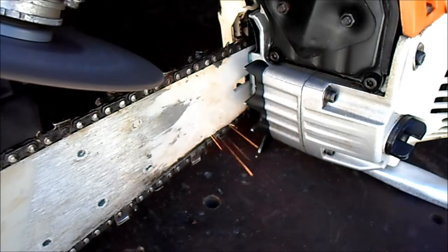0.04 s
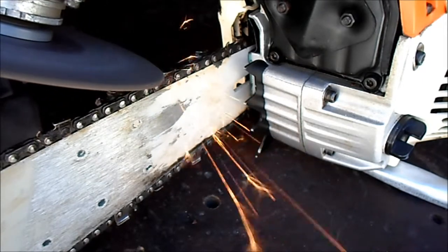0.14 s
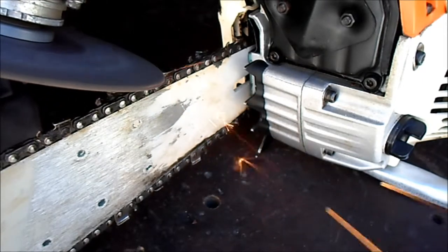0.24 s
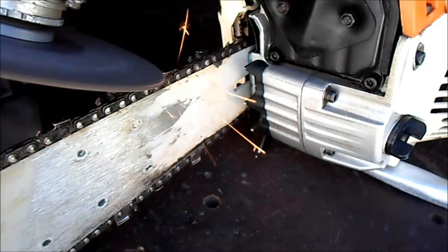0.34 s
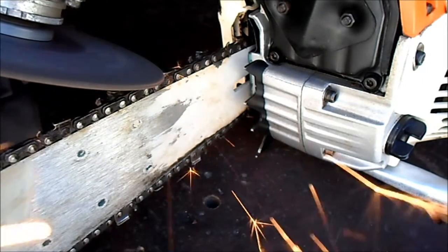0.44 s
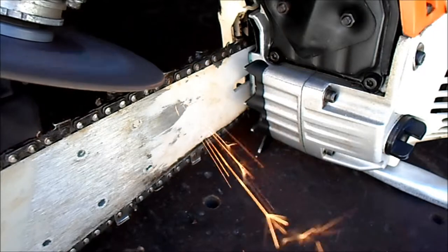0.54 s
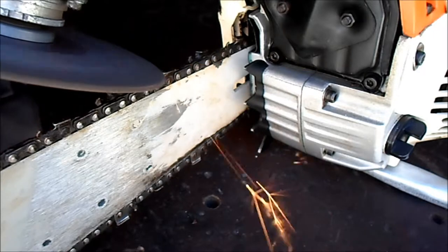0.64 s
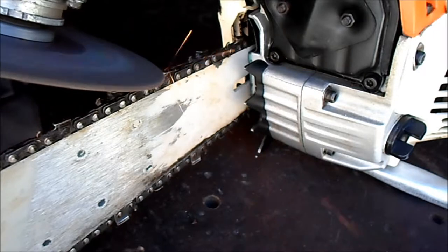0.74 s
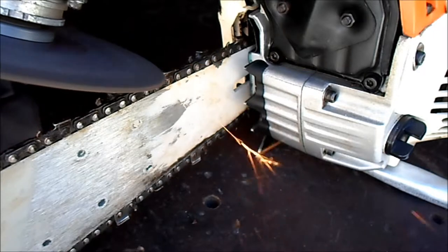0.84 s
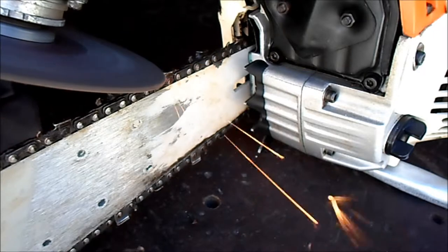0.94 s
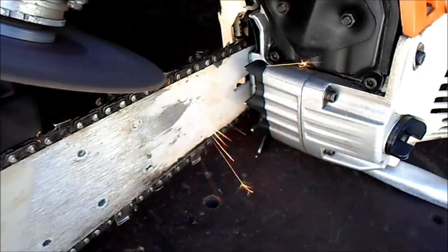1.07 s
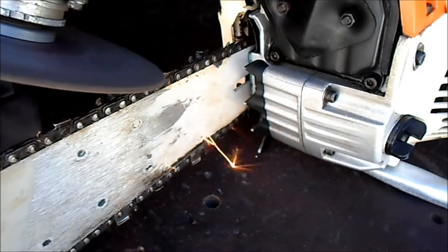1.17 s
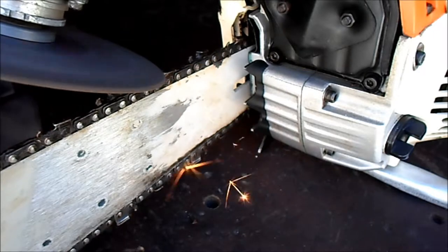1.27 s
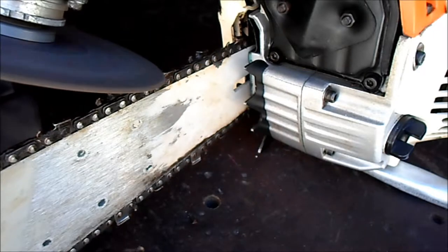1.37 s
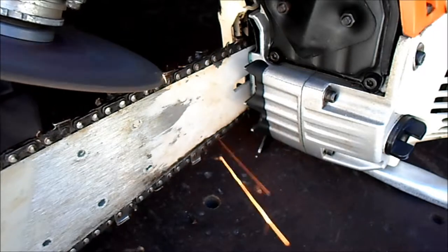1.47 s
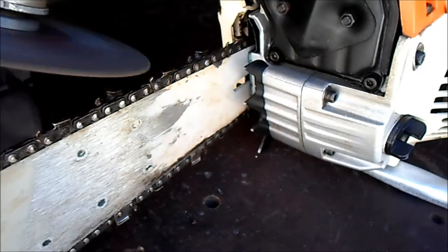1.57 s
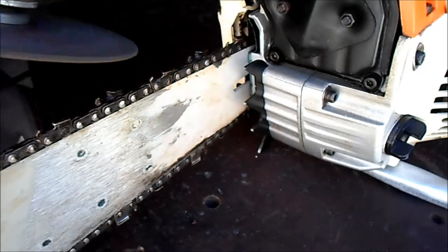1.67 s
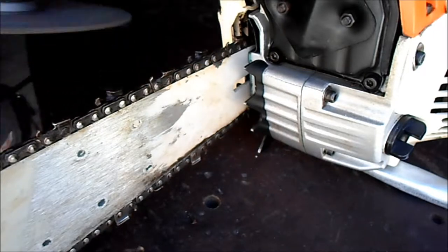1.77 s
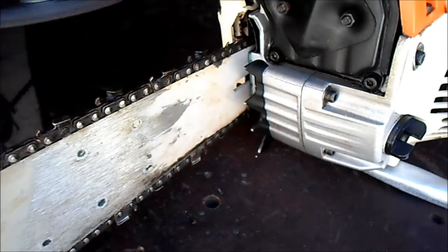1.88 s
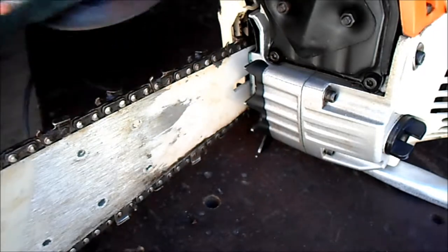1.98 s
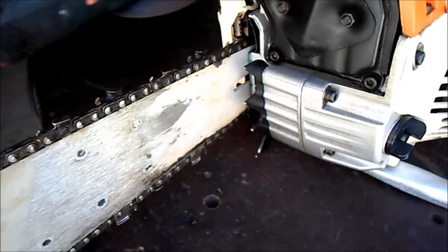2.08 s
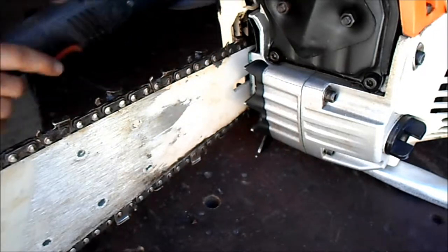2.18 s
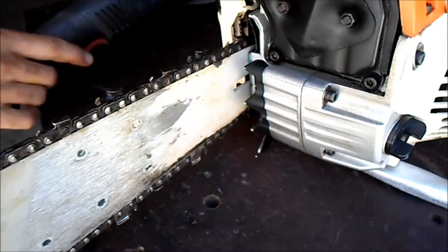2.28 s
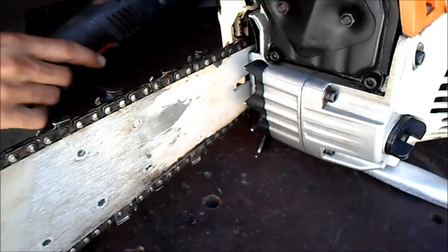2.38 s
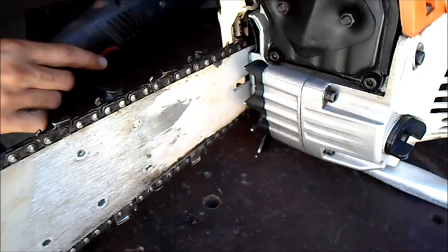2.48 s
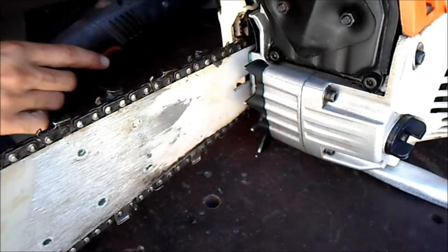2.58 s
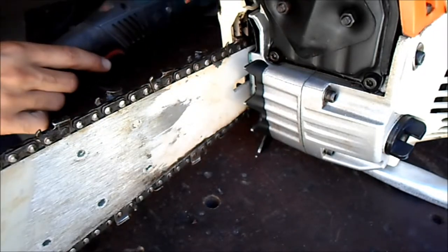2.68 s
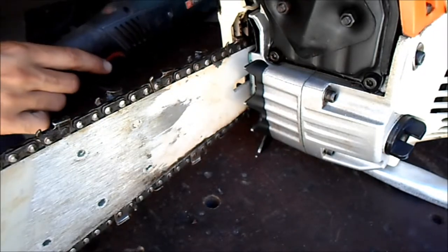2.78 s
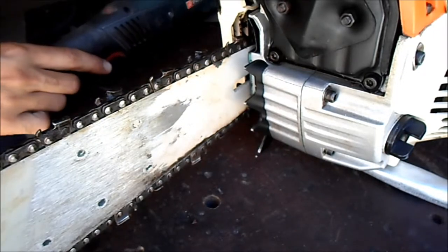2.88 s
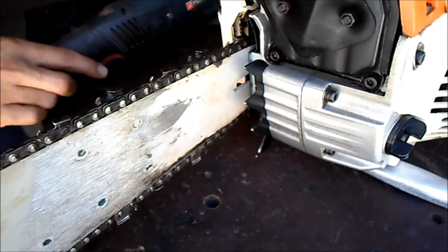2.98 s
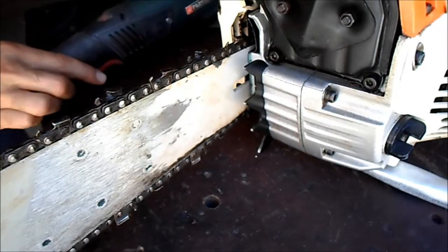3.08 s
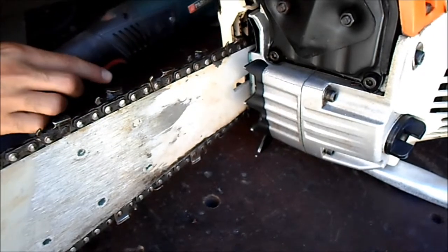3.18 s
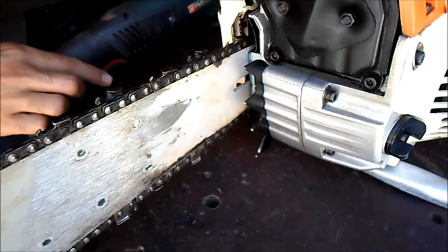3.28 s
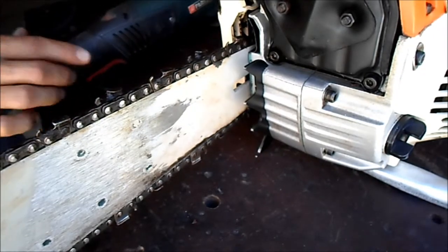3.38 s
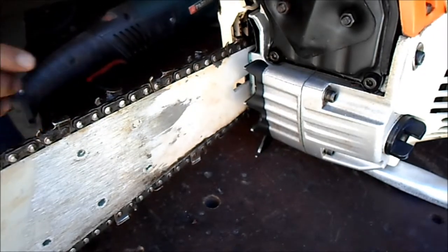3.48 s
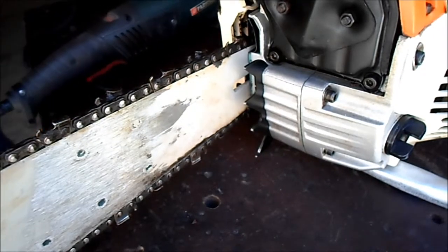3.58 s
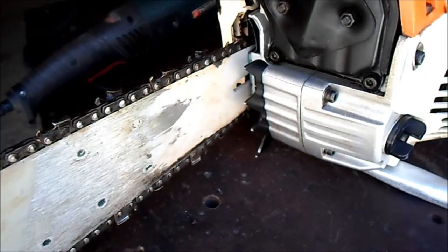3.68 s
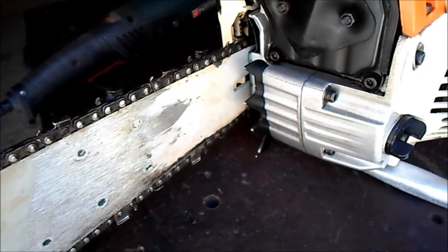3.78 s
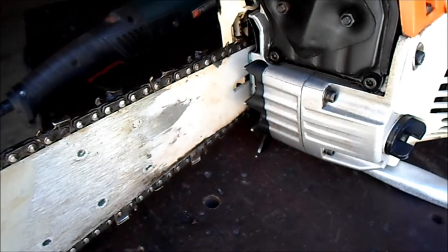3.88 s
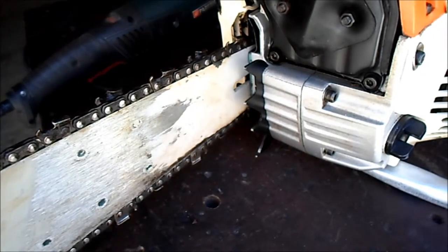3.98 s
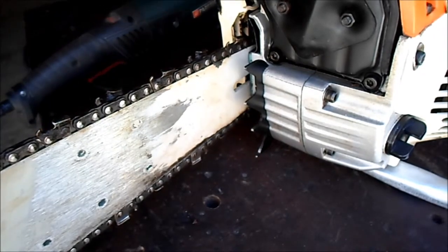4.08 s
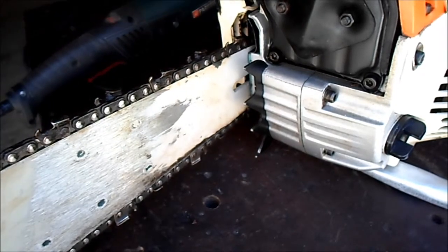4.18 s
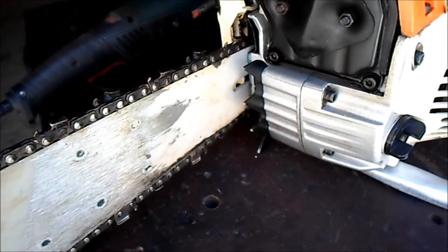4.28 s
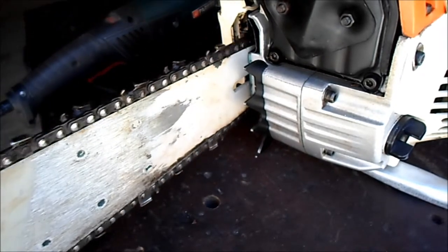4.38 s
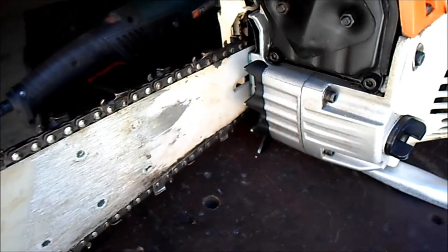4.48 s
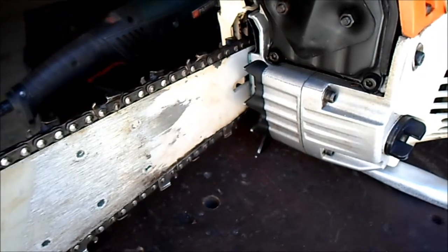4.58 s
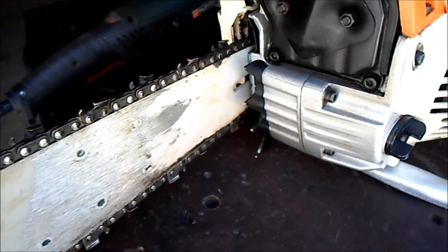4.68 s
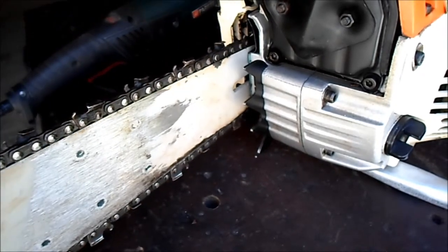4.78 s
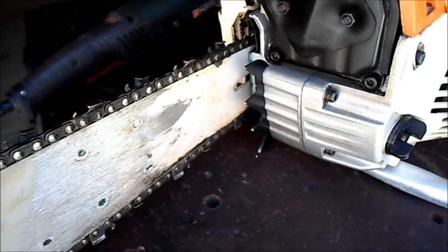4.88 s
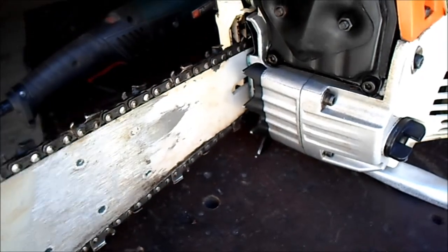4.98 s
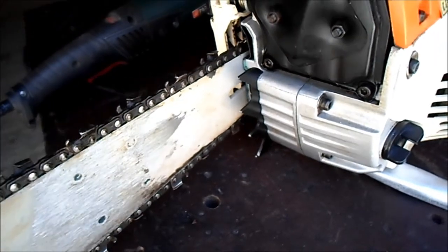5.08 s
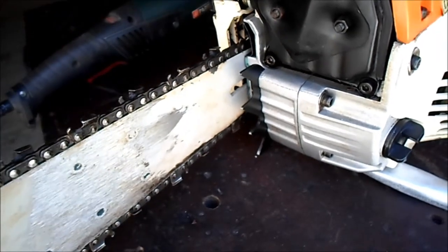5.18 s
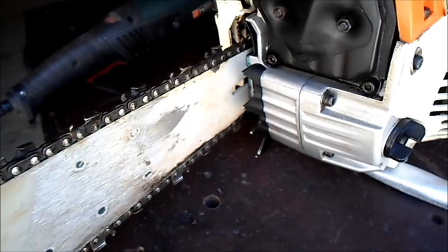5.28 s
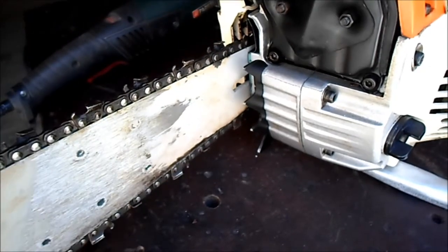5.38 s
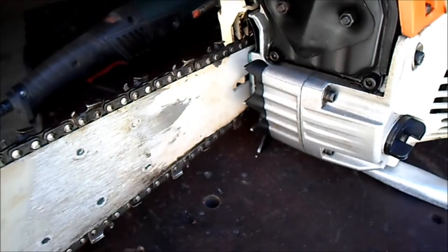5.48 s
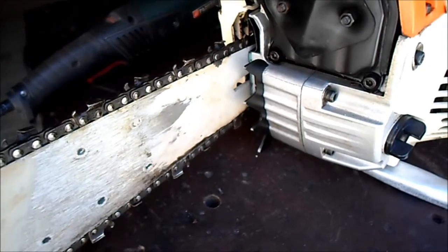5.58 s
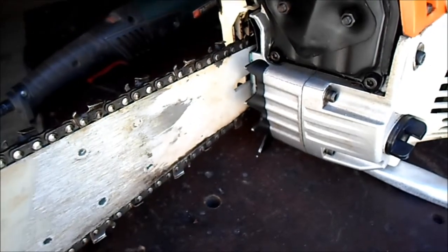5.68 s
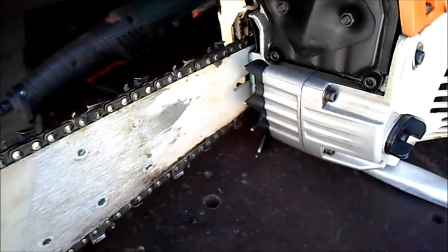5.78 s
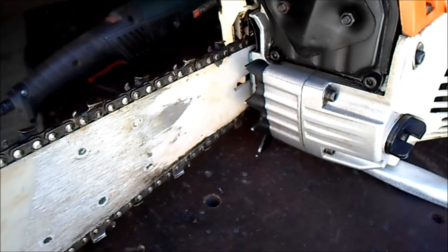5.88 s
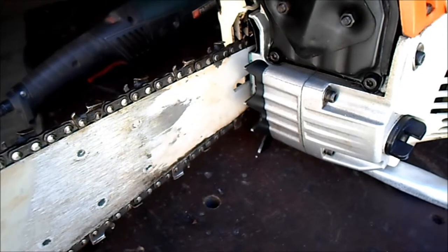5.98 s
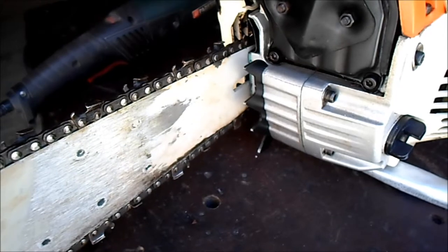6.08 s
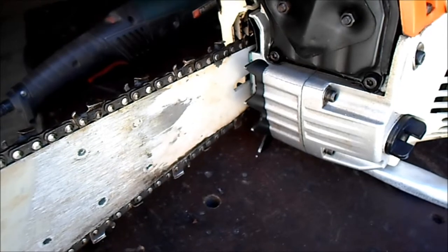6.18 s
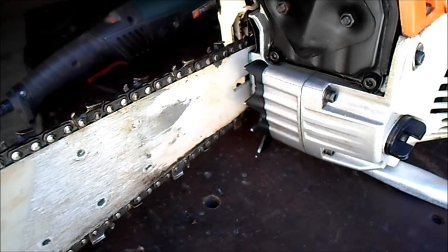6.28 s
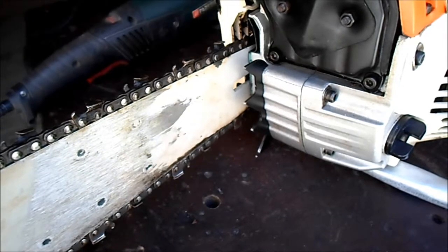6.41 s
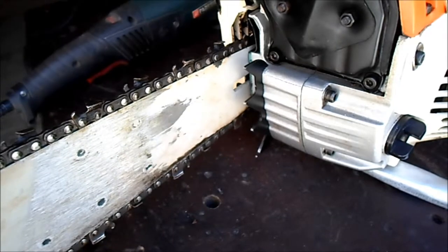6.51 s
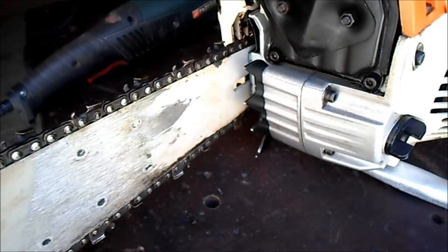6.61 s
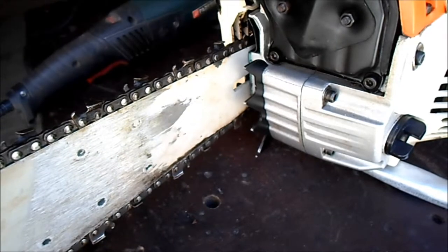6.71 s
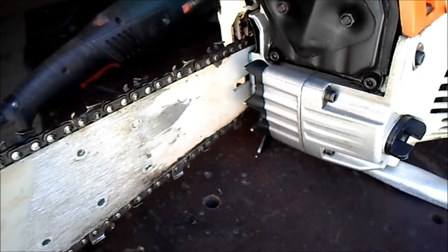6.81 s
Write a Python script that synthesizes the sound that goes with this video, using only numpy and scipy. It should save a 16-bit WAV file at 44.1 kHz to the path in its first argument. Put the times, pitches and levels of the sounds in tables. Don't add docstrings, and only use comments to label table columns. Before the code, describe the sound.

Close up in a workshop, a switched-off angle grinder slows against a saw chain tooth: bright, gritty, throbbing hiss with a sinking whine. It lifts away and its loose gears whirr and clatter, ever slower. The tool thumps onto a hollow bench and the disc scrapes and catches to a stop. Over low room rumble come a sharp snap, small clicks, heavy knocks and faint rustling.

```python
import sys
import numpy as np
from scipy import signal
from scipy.fft import rfft, irfft
from scipy.io import wavfile
from scipy.ndimage import uniform_filter1d

SR = 44100
rng = np.random.default_rng(int(sys.argv[2]) if len(sys.argv) > 2 else 0)


def persist_wave(psi):
    counts = np.round(np.clip(psi, -1, 1) * 32767).astype(np.int16)
    wavfile.write(sys.argv[1], SR, np.atleast_2d(counts).T)


def gain_from_decibels(decibels):
    exponent = np.asarray(decibels, float) / 20
    return 10 ** exponent


N = 302085
T = np.arange(N) / SR
LIFT_OFF_S = 1.742
FLAT = ((1, 0), (2, 0))  # (frequency [Hz], level [dB])


def evened(x):
    return x / np.sqrt(np.mean(x ** 2) + 1e-20)


def curves(rows, outside=None):
    s, first, *rest = np.transpose(rows)
    return [np.interp(T, s, first, outside, outside)] + [np.interp(T, s, c) for c in rest]


def colour(x, peaks, lo_hz, hi_hz, base_db=-14, spectrum=FLAT):
    hz = abs(np.fft.fftfreq(8192, 1 / SR)) + 1
    f, db = np.transpose(spectrum)
    power = gain_from_decibels(2 * (base_db + np.interp(np.log(hz), np.log(f), db)))
    power = power + sum(gain_from_decibels(2 * d) / (1 + (2 * (hz - c) / w) ** 2) for c, w, d in peaks)
    power = power / (1 + (lo_hz / hz) ** 8) / (1 + (hz / hi_hz) ** 12)
    log_response = np.conj(signal.hilbert(np.log(power + 1e-10) / 2))
    taps = np.fft.ifft(np.exp(log_response)).real[:4096]
    return signal.oaconvolve(x, taps / np.linalg.norm(taps))[:N]


def gritty(per_s, spread_db, share):
    size = gain_from_decibels(spread_db * np.minimum(rng.exponential(1, N), 5)) * (rng.random(N) < per_s / SR)
    smear = np.exp(-np.arange(60) / 14)
    grains = evened(np.convolve(size, smear)[:N])
    return evened((1 + share * grains) * rng.standard_normal(N))


def mottled(x, depth_db, frames, bins):
    z = signal.stft(x, nperseg=256)[2]
    patches = uniform_filter1d(rng.standard_normal(z.shape), bins, axis=0)
    patches = depth_db * evened(uniform_filter1d(patches, frames, axis=1))
    z = z * gain_from_decibels(patches) / np.sqrt(np.mean(gain_from_decibels(2 * patches)))
    return signal.istft(z, nperseg=256)[1][:N]


def bursts(events, peaks, lo_hz, split_hz, rise, echo_db, echo_t60, spectrum=FLAT, base_db=-14,
           tick=0., spike_db=-99):
    low, high = np.zeros((2, N + SR))
    noise, spikes = rng.standard_normal(N), np.zeros((2, N))
    t = np.arange(round(.2 * SR)) / SR
    tail = gain_from_decibels(echo_db - 60 * t / echo_t60) * np.minimum(t / 0.0076, 1)
    for s, peak_db, treble_db, length in events:
        rap = np.exp(-(t / max(length, .0005)) ** 1.26) + tick * np.exp(-t / 0.00083)
        rap *= np.minimum(t / rise, 1)
        at = round(s * SR)
        rap *= np.linalg.norm(rap) / np.linalg.norm(rap[:N - at] * noise[at:at + len(t)])
        low[at:at + len(t)] += gain_from_decibels(peak_db - 11) * (rap + tail)
        high[at:at + len(t)] += gain_from_decibels(peak_db - 6.5 + treble_db) * (rap ** 1.26 + tail)
        spikes[:, at + 4] += gain_from_decibels([peak_db + spike_db, peak_db + spike_db + treble_db])
    low = colour(low[:N] * noise + spikes[0], peaks, lo_hz, split_hz, base_db, spectrum)
    return low + colour(high[:N] * noise + spikes[1], peaks, split_hz, 21000, base_db, spectrum)


# (frequency [Hz], level [dB per Hz])
SHOP = [(12, -33), (20, -6), (43, -2), (86, -4.5), (217, -24.5), (464, -22), (549, -25.5), (668, -27),
        (910, -30.5), (1390, -27), (1790, -31.5), (2960, -41), (3920, -44), (14300, -62), (16400, -79)]
# (centre time [s], level [dB], half length [s])
RUSTLE = [(3.624, -62, 0.044), (4.006, -58, 0.018), (4.525, -53, .015), (4.608, -53, 0.078),
          (4.875, -58, 0.03), (5.157, -48, 0.023), (5.243, -50, 0.051), (5.434, -48, 0.055),
          (5.552, -56, 0.061), (5.849, -43.5, 0.011), (5.917, -45, 0.036), (6.0, -51.5, .012),
          (6.237, -60, .015), (6.48, -56, 0.045)]


def background():
    lumps = evened(uniform_filter1d(uniform_filter1d(rng.standard_normal(N), size=2500), size=2500))
    hums = [(42.2, 26, 0.6), (82.6, 30.4, -2.5)]  # (frequency [Hz], width [Hz], level [dB])
    shop = evened(colour(rng.standard_normal(N), hums, 25.4, 20000, -1.5, SHOP))
    rumble = signal.sosfiltfilt(signal.butter(2, 250, fs=SR, output="sos"), shop)
    shop = gain_from_decibels(-35.5) * (shop - rumble + rumble * gain_from_decibels(1.0 * lumps))
    hiss = gain_from_decibels(-66) * colour(rng.standard_normal(N), [], 8700, 20000)

    grains = gritty(per_s=1200., spread_db=2.5, share=.3)
    rustle = colour(grains, [(14500, 3900, -1.0), (7460, 3400, -7.0)], 2000, 21000, 3)
    strokes = sum(gain_from_decibels(db) * np.exp(-((T - at) / half) ** 2) for at, db, half in RUSTLE)

    open_db, held_db, sink_db_per_s, recover_s = 1.33, -14.5, -2, 0.46
    drop_db = held_db - open_db + sink_db_per_s * np.minimum(T, LIFT_OFF_S)
    gain_db = open_db + drop_db * np.exp(-(np.maximum(T - LIFT_OFF_S, 0) / recover_s) ** 1.34)
    dent_s, dent_db, dent_recover_s = 3.32, -8, 0.48
    since = np.maximum(T - dent_s, 0)
    gain_db += dent_db * np.minimum(since / .15, 1) * np.exp(-since / dent_recover_s)
    return (shop + hiss) * gain_from_decibels(gain_db) + rustle * strokes


# (time [s], peak level [dB], treble over it [dB])
CLICKS = [(3.611, -37, -12), (3.658, -35.5, -21), (4.571, -31, -18), (4.632, -34, -33), (4.772, -25.5, -29),
          (5.3618, -27, -15), (5.4037, -24, -9), (5.4161, -35, -6), (5.4322, -26, -10), (5.4731, -31, -6),
          (5.4995, -34, -6), (5.5216, -31, 1), (5.5391, -34, -4), (5.5545, -34, -2), (5.5781, -31, 0),
          (5.867, -34, -8), (5.943, -42, -19), (6.4981, -28, -10)]
# (frequency [Hz], width [Hz], level [dB])
PARTS = [(870, 1000, -6), (2070, 160, -2.5), (3600, 500, -18), (5170, 1100, -12), (7140, 1200, -6.5),
         (11300, 3800, -16), (14500, 2100, -14)]


def clicks():
    click_s, loud_s_per_db = .0031, .00007
    hits = [(s, db, treble_db, click_s + loud_s_per_db * (db + 25)) for s, db, treble_db in CLICKS]
    return bursts(hits, PARTS, 610, 3580, .0001, -27, 0.18, tick=.6, spike_db=-2)


# (time [s], peak level [dB], treble over it [dB], length [s])
CRUNCH = [
    (2.44, -33.5, -1, 0.049),
    (3.038, -12.5, -7.5, 0.0092),
    (4.546, -30.5, -1.5, 0.024),
    (5.606, -23, -6, 0.02),
    (5.613, -20.5, -3, 0.009),
    (5.887, -19, -10, 0.008),
]


def crunch():
    top = [(840, 650, 5.0), (1320, 910, -14), (2000, 460, -3), (3500, 400, -1)]
    return bursts(CRUNCH, top, 430, 1370, 0.0011, -23, 0.29, [(1000, 19), (4500, 0), (8000, -30)])


# (time [s], peak level [dB], treble over it [dB], length [s])
LATCH = [
    (4.1195, -10.5, 3.5, 0.00089),
    (4.1207, -17, 2.5, 0.0024),
]
CLIP = [
    (4.545, -24, 2.5, .001),
    (4.5458, -13, 4, 0.0022),
]
CATCH = [
    (5.8868, -24, 2.5, .003),
    (5.8898, -14, 4, 0.0017),
    (5.8913, -11.5, 4, .003),
    (5.8985, -26, -1.5, .002),
    (5.906, -31, -1.5, .003),
]
# (frequency [Hz], width [Hz], level [dB])
LATCH_PART = [(855, 46, -5.5), (2150, 80, 4), (3370, 190, -1), (3946, 150, -7), (4320, 200, -3),
              (4970, 300, -3.5), (6000, 130, -5), (8600, 780, -6), (11400, 1500, -10)]
CLIP_PART = [(1530, 100, -10), (2220, 150, -1), (3192, 150, -8), (4200, 200, -4), (5000, 600, -8),
             (6336, 150, -8), (7100, 160, 0.5), (7397, 110, 0), (8091, 200, -6), (12000, 700, -13),
             (14500, 900, -10)]
CATCH_PART = [(740, 140, 2), (1071, 60, -6), (2115, 110, 7), (2380, 70, -6), (3280, 350, -7),
              (4040, 250, -7.5), (4590, 120, -6), (6650, 180, -9), (7300, 330, -5), (8200, 300, -8)]


def snaps():
    sets = [(LATCH, LATCH_PART), (CLIP, CLIP_PART), (CATCH, CATCH_PART)]
    return sum(bursts(hits, part, 560, 3060, .0004, -30, .2, base_db=-15, tick=.2, spike_db=6)
               for hits, part in sets)


# (frequency [Hz], level [dB], time to fade by 60 dB [s])
BENCH = [(157.3, -7.5, 0.13), (243.4, -7, 0.074), (376.2, 4.5, 0.082), (382.7, -8, 0.36),
         (503.5, -11, 0.15), (736, -4, 0.1), (825, -3, 0.068), (1003, -6, 0.06), (1224, -8, 0.11),
         (1410, -9, 0.074)]
# (time [s], peak level [dB], hardness [dB], weight [dB], rise [ms])
KNOCKS = [(2.46, -31.5, 6, 8, 1.5), (2.838, -36, 6, 3, 1.4), (3.0385, -5.5, -7, 4, 0.83),
          (3.087, -16.5, -1, 4, 2.5), (3.185, -18.5, -8, -7, 2), (3.279, -8.5, -9, 8, 2.4),
          (3.371, -28.5, 0, 5, 2), (4.544, -27.5, 2, 9, 2), (4.636, -30.5, 3, 9, 1.8),
          (4.772, -31, -2, 10, 2.3), (5.4041, -23, 1.5, -6, 1), (5.413, -25, -5, 9, 2.2),
          (5.4305, -22.5, 0, 2, 0.92), (5.437, -19, -9, -3.5, 1.1), (5.5992, -6.5, -13, -5, 6.3),
          (5.609, -14, -1.5, -3, 1.7), (5.6131, -7.5, -10, -4, 1.1), (5.671, -18.5, -9, 6.5, 1.7),
          (5.887, -17.5, 4, 4.5, 1.7), (5.912, -27, 0, 3, 2), (5.941, -26, 6, 2, 2),
          (5.968, -24.5, -18, -1, 5), (6.507, -39, 12, -3, 0.74)]
# (time [s], level [dB])
DRONE = [
    (2.7, -70),
    (2.8, -51),
    (3.082, -49.5),
    (3.188, -33.5),
    (3.222, -43),
    (3.28, -33),
    (3.4, -38.5),
    (3.5, -68),
]


def knocks():
    out, t = np.zeros(N + SR), np.arange(round(.4 * SR)) / SR
    chances = rng.uniform(-1.4, 1, (len(KNOCKS), 12))
    for (s, peak_db, hard_db, heavy_db, rise_ms), luck in zip(KNOCKS, chances):
        ring = np.zeros(len(t))
        for (hz, db, t60), u in zip(BENCH, luck):
            tone_db = db + hard_db * (hz > 600) + heavy_db * (hz < 300) + 3.2 * u
            ring += gain_from_decibels(tone_db - 60 * t / t60) * np.sin(2 * np.pi * hz * (1 + 0.012 * u) * t)
        ring *= -np.minimum(t / max(rise_ms / 1000, .0003), 1)
        out[round(s * SR):][:len(t)] += gain_from_decibels(peak_db) * ring / abs(ring).max()
    shaken = rng.standard_normal(N) * gain_from_decibels(curves(DRONE, -120)[0])
    return out[:N] + colour(shaken, [(381, 24, 1.0), (534, 96, -7.5), (720, 71, -5.5)], 255, 1230, -25)


# (time [s], level [dB], treble over it [dB])
SCRAPE = [
    (3.246, -35, -14),
    (3.26, -21, -7),
    (3.288, -18, -3.5),
    (3.302, -25.5, -5),
    (3.378, -23.5, -8.5),
    (3.464, -50, -3),
    (3.5, -52, -20),
]
# (time [s], peak level [dB])
CATCHES = [(3.2445, -14.5), (3.26, -14), (3.265, -11.5), (3.272, -9.5), (3.2852, -6), (3.296, -16),
           (3.314, -18), (3.326, -16.5), (3.347, -19.5), (3.3672, -9), (3.391, -20), (3.406, -24)]
# (frequency [Hz], width [Hz], level [dB])
TOOTH = [(11250, 250, -11), (12350, 200, -10), (13150, 180, 0), (13800, 240, 0), (14130, 240, 0),
         (14750, 300, -10), (15250, 200, -8), (15600, 250, -7)]
BAR = [(1516, 200, -18), (3000, 50, -7.5), (3470, 46, -7), (3860, 28, -3), (4020, 156, -6), (4990, 36, 0),
       (6960, 150, -1.5), (7870, 98, -27), (8860, 87, -11), (8250, 58, -13), (9050, 210, 0.5),
       (9740, 89, -0.5)]


def scraping():
    db, treble_db = curves(SCRAPE, -120)
    rub = gritty(per_s=700., spread_db=1.0, share=0.27) * gain_from_decibels(db - 4)
    plate = [(964, 42, -1), (1620, 150, -7.5), (2380, 230, -2.5), (3250, 200, 2.5), (3870, 120, -7.5),
             (4900, 230, -11.5)]
    drag = colour(rub, plate, 550, 5600, -20.0)
    drag += colour(rub * gain_from_decibels(treble_db), BAR + TOOTH, 5000, 17000, -1.5)
    catch_treble_db, catch_s = -8.5, 0.0058
    hits = [(*row, catch_treble_db, catch_s) for row in CATCHES]
    return mottled(drag, 3.0, frames=5, bins=3) + bursts(hits, plate, 1500, 6000, .0003, -18, .07, tick=.8)


# (time [s], level [dB])
COAST = [
    (1.74, -49),
    (1.95, -44.5),
    (2.2, -40),
    (2.62, -40.5),
    (3.216, -43.5),
    (3.25, -51),
]
# (frequency [Hz], level [dB per Hz])
GEARS = [(1000, -8.5), (2000, -17), (3500, -5.5), (5500, 0), (8000, -6.5), (11000, -13), (12500, -23),
         (14000, -17), (16000, -32)]
# (frequency [Hz], width [Hz], level [dB])
HOUSING = [(2050, 290, -8), (2370, 400, -10.5), (3120, 300, 3), (3830, 230, -5.5), (4750, 290, -4),
           (7600, 480, -19.5), (10400, 1700, -26), (15300, 400, -22)]
# (time [s], peak level [dB], treble over it [dB])
SLAPS = [
    (0.043, -11, -4),
    (.0855, -10.5, -2),
    (0.1265, -10.5, -1.5),
    (.171, -17, 0),
    (.206, -19, -27),
    (.245, -12.5, -4),
    (.293, -12.5, -6),
    (.452, -20.5, -10),
    (.592, -20, -8),
]
# (time [s], peak level [dB], treble over the trend [dB])
CLATTER = [(1.7683, -18.5, -2), (1.815, -22, -0.5), (1.8513, -25.5, 0), (1.895, -23.5, 4), (1.94, -21.5, 3),
           (1.9668, -17.5, 0), (2.0085, -17, 0), (2.045, -14, 0), (2.0933, -13.5, -7), (2.1355, -12, -3),
           (2.185, -14, -6), (2.224, -18.5, 4), (2.284, -15.5, -1), (2.328, -14, 4), (2.3888, -10, -1),
           (2.4503, -17.5, -12), (2.495, -17.5, -3), (2.545, -14, -1), (2.6, -9.5, -1), (2.6525, -10.5, 0),
           (2.7184, -22, 5), (2.77, -10, -3), (2.8246, -13, 5.5), (2.886, -11.5, -1), (2.9638, -9.5, 4),
           (3.003, -14.5, 5), (3.0709, -14.5, 2), (3.12, -17, 1), (3.1597, -19, 4)]
# (time [s], peak level [dB])
REBOUNDS = [(2.0965, -17.5), (2.114, -19), (2.1815, -20), (2.2268, -18.5), (2.262, -23), (2.2805, -21),
            (2.287, -18), (2.332, -18), (2.361, -16), (2.4015, -15.5), (2.615, -20), (2.833, -15),
            (2.882, -18.5), (2.985, -18.5), (2.4726, -20), (2.52, -17), (2.673, -16), (2.794, -19),
            (2.852, -13.5), (2.907, -11.5), (2.9307, -22), (3.0307, -16), (3.085, -19), (3.1836, -21)]


def gearbox():
    treble_db = -0.5 - 10 * np.clip((T - 2.5) / 0.71, 0, 1)
    rub = gritty(per_s=500., spread_db=4.0, share=.45) * gain_from_decibels(curves(COAST, -120)[0])
    lower = [(1550, 900, -16), (3150, 300, -3), (4750, 350, 3), (5700, 500, -4)]
    whirr = colour(rub, lower, 950, 6000, -3, GEARS)
    whirr += colour(rub * gain_from_decibels(treble_db), HOUSING, 7400, 20000, -6, GEARS)

    slap_s, clatter_s, rebound_s = .008, .006, .005
    case = [(2500, 200, 0), (3300, 250, -8), (5200, 500, -3), (7500, 600, -7)]
    early = bursts([(*row, slap_s) for row in SLAPS], case, 2060, 4030, 0.00054, -32, .1, base_db=-26)

    start_treble_db, dulling_db_per_s = -2.5, -11.5
    hits = [(*row, clatter_s) for row in CLATTER] + [(*row, 0, rebound_s) for row in REBOUNDS]
    hits = [(s, db, start_treble_db + over_db + dulling_db_per_s * (s - LIFT_OFF_S), length)
            for s, db, over_db, length in hits]
    clatter = bursts(hits, HOUSING, 1900, 6000, .0012, -21, .08, GEARS, -14, tick=.3, spike_db=2)
    return mottled(whirr, 2.2, frames=16, bins=3) + mottled(clatter, 3.0, frames=6, bins=5) + early


def rim_surface(turns, lasts):
    grains = uniform_filter1d(rng.standard_normal((130, 1024)), max(round(lasts), 1), axis=0)
    uneven = gain_from_decibels(3 * np.clip(rng.standard_normal(513), -2, 1.6))
    grains = irfft(rfft(grains) * uneven * np.clip(np.arange(513) / 40, .75, 1))
    turn = np.clip(turns + 2, 0, 129).astype(int)
    return evened(grains[turn, (turns % 1 * 1024).astype(int)])


# (share of a turn, level [dB])
RIM = [(0, 2.5), (.05, 3.5), (.15, -2), (.22, 2), (.33, -6.5), (.42, -11.5), (.49, -10.5), (.56, -3.5),
       (.67, 3), (.82, -2), (.93, 0), (1, 0)]
# (time [s], level [dB])
GRIND = [
    (0, -25),
    (.09, -24.5),
    (.15, -22),
    (.22, -24.5),
    (.7, -24),
    (1.1, -22),
    (1.57, -27),
    (1.63, -24),
    (1.74, -27),
]
# (time [s], level [dB], half length [s])
LIFTS = [
    (.038, -5, .006),
    (0.225, -8, .0036),
    (.567, -7, 0.0095),
    (0.822, -16, .005),
    (.8305, 5, .002),
    (.838, -12, .004),
    (1.604, -8, 0.0056),
    (1.623, 4, .002),
    (1.73, -9, .004),
    (1.735, 5, .002),
]
# (frequency [Hz], level [dB per Hz])
GRIT = [(59, -44.5), (100, -18.5), (420, -17), (1950, -12.5), (2720, -15), (3060, 1), (4540, -12.5),
        (5110, 0), (6220, -15.5), (6860, -2.5), (11000, -9), (14300, -24), (22000, -120)]
# (multiple of disc speed, level at start [dB], fade [dB per s])
WHINE = [(1.0, -59.5, 1), (1.986, -62.5, -3), (3.0, -58, 4), (4.0, -63, 2), (4.97, -61.5, 0.5),
         (6.99, -61, 8), (16.9, -66, 1), (18.8, -67, 4), (24.9, -55, 7), (45.9, -55, 4), (49.3, -52, 6.5),
         (56.2, -50, 8), (84.4, -47, 6), (95.5, -50, 2)]
# (frequency [Hz], level [dB])
MESH = [(2300, -60), (2950, -54), (3700, -41), (4100, -43), (4450, -50), (4900, -44), (5250, -36)]


def grinding():
    start_turn, start_rps, drag_rps2, brake_rps3 = -.468, 76.81, 22.177, 5.518
    t = np.minimum(T, 1.8)
    turns = start_turn + start_rps * t - drag_rps2 * t ** 2 / 2 - brake_rps3 * t ** 3 / 6
    speed = start_rps - drag_rps2 * t - brake_rps3 * t ** 2 / 2

    leave_db = np.where(T > LIFT_OFF_S, -120, -7 * np.clip(1 + (T - LIFT_OFF_S) / 0.017, 0, 1))
    pressure_db = curves(GRIND)[0]
    bar_db = -28 + 0.59 * (pressure_db + 24) + leave_db
    pressure_db = pressure_db + leave_db

    uneven = 0.57 + (1.15 - 0.57) * np.minimum(t / 1.9, 1)
    wobble = evened(uniform_filter1d(rng.standard_normal(N), size=500))
    bite_db = uneven * np.interp((turns + 0.019 * wobble) % 1, *np.transpose(RIM))
    bite_db += sum(db * np.exp(-((T - at) / half) ** 2) for at, db, half in LIFTS)

    grit = gritty(per_s=1800., spread_db=3.6, share=.45)
    worn = evened(grit + 1.25 * rim_surface(turns, lasts=14))
    hiss = colour(grit * gain_from_decibels(pressure_db + 1.5 + bite_db), TOOTH, 10400, 18000, -20)
    ring = colour(worn * gain_from_decibels(bar_db + 0.8 * bite_db), BAR, 85, 15300, -5.5, GRIT)

    tones = sum(np.sqrt(2) * gain_from_decibels(db - fade * T) * np.sin(2 * np.pi * k * turns + 0.49 * wobble)
                for k, db, fade in WHINE)
    teeth = 74
    mesh = 1 + .5 * np.cos(2 * np.pi * turns)
    mesh_db = np.interp(teeth * speed, *np.transpose(MESH)) + .8 * bite_db
    tones += np.sqrt(2) * gain_from_decibels(mesh_db) * mesh * np.sin(2 * np.pi * teeth * turns + .8 * wobble)
    return hiss + mottled(ring, 1.68, frames=60, bins=2) + tones * (pressure_db > -100)


def scene():
    after = background() + clicks() + crunch() + snaps() + knocks()
    return (after + scraping() + gearbox() + grinding())[None]


def band_limit(x):
    return signal.sosfilt(signal.butter(12, 16550, fs=SR, output="sos"), x)


def record(dry):
    edge = signal.firwin(301, 15840, window=("kaiser", 6), fs=SR)
    mix = signal.oaconvolve(dry, edge[None], "same")
    return band_limit(mix)


dry = scene()
out = record(dry)
persist_wave(out)
```